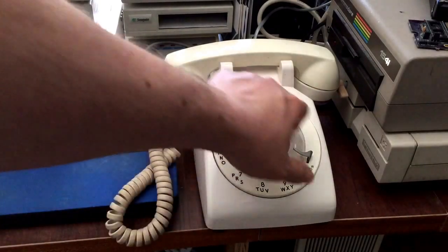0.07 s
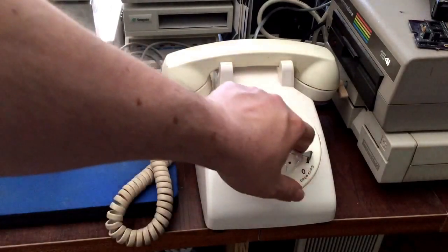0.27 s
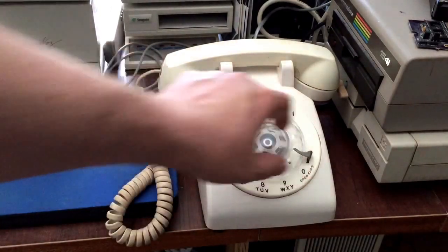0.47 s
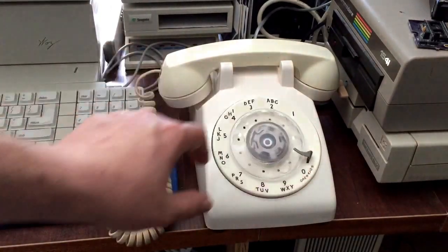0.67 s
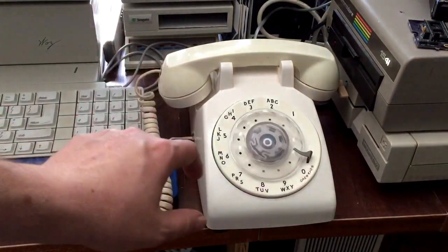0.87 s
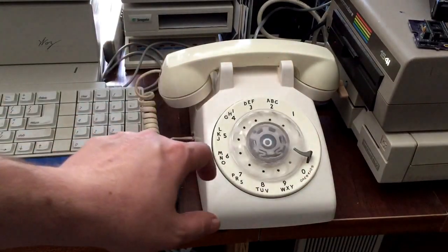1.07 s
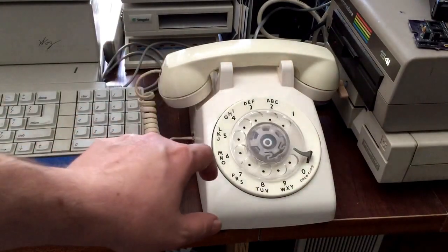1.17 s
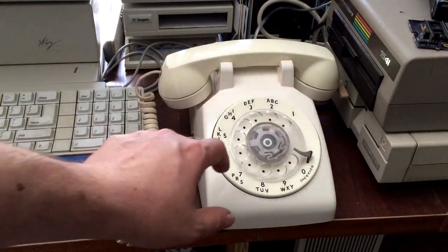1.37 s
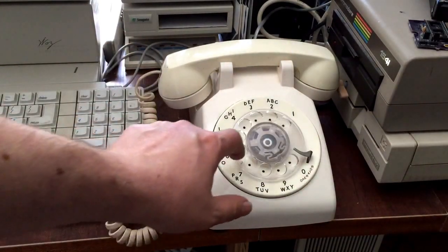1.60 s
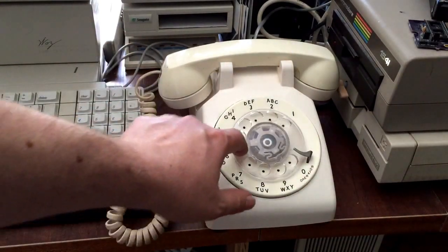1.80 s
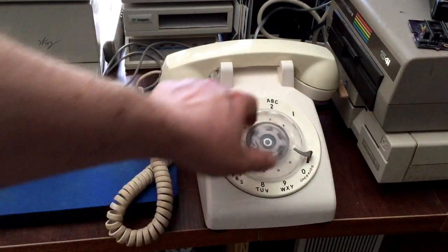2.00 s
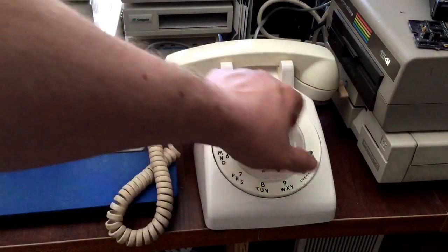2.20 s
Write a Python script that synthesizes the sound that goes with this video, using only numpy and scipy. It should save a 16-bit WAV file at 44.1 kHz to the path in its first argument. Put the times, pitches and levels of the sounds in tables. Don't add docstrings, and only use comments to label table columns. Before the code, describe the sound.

Close microphone in a small room with faint fan hum: gritty dial winding and a sharp stop click, a ticking geared return ending in a loud hard clack, then quiet, faint touches and renewed winding.

```python
import sys
import numpy as np
from scipy import signal
from scipy.fft import rfft, irfft
from scipy.io import wavfile
from scipy.ndimage import uniform_filter1d, map_coordinates

SR = 44100
rng = np.random.default_rng(int(sys.argv[2]) if len(sys.argv) > 2 else 0)


def to_linear_factor(level_db):
    exponent = np.asarray(level_db, float) / 20
    return 10 ** exponent


def master(y):
    cut = np.clip(np.atleast_2d(y).T, -1, 1)
    pcm = np.round(cut * 32767)
    wavfile.write(sys.argv[1], SR, pcm.astype(np.int16))


N = 99225
T = np.arange(N) / SR
HZ = np.fft.rfftfreq(1 << 17, 1 / SR)

# (frequency [Hz], width [Hz], level [dB])
PLATE_MODES = [(2395, 340, -10.5), (3020, 295, -0.5), (3287, 320, -5), (3820, 820, -9.5), (4360, 150, -9)]
# (frequency [Hz], width [Hz], level [dB])
SHELL_MODES = [(560.5, 99, 9.5), (724, 120, -28), (1116, 135, 3.5), (1520, 190, 1.5), (1755, 68, 1.5)]


def unit(x):
    return x / np.sqrt(np.mean(x ** 2) + 1e-20)


def along(points, hz):
    f, v = np.transpose(points)
    return np.interp(np.log(hz + 1), np.log(f + 1), v)


def level(rows, column=1):
    r = np.array(rows)
    return to_linear_factor(np.interp(T, r[:, 0], r[:, column], -150, -150))


def wobble(rate):
    knots = rng.standard_normal(int(N * rate / SR) + 4)
    return map_coordinates(knots, [T * rate])


def body(x, peaks, bed=((1, -60),), bed_db=0):
    low_cut = np.minimum(HZ / bed[0][0], 1) ** 4
    power = to_linear_factor(2 * (along(bed, HZ) + bed_db)) * low_cut
    for hz, width, db in peaks:
        power = power + to_linear_factor(2 * db) / (1 + (2 * (HZ - hz) / width) ** 2) ** 1.86
    cepstrum = irfft(np.log(power / power.mean() + 1e-12) / 2)
    half = len(HZ) - 1
    cepstrum[1:half] *= 2
    cepstrum[half + 1:] = 0
    return irfft(rfft(x, 2 * half) * np.exp(rfft(cepstrum)))[:N]


def bursts(times, dbs, lengths, rise=0.22):
    t = np.arange(SR // 8) / SR
    out = np.zeros(N + len(t))
    for s, db, length in zip(times, dbs, np.maximum(lengths, 1e-3)):
        attack = (1 - np.exp(-t / (rise * length))) ** 2
        shape = attack * to_linear_factor(db - 20 * t / length)
        out[round(s * SR):][:len(t)] += shape * np.sign(rng.standard_normal(len(t)))
    return out[:N]


def grit(rate, spread_db, smooth):
    struck = rng.random(N) < rate / SR
    hits = struck * to_linear_factor(spread_db * rng.exponential(size=N)) * rng.standard_normal(N)
    return unit(unit(hits) + smooth * rng.standard_normal(N))


def ringing(rings):
    out = np.zeros(N)
    for s, hz, db, t60 in rings:
        t = np.maximum(T - s, 0)
        envelope = (1 - np.exp(-t / 0.0015)) * to_linear_factor(db - 60 * t / t60)
        out += envelope * np.sin(2 * np.pi * hz * t)
    return out


def winding():
    # (time [s], level [dB])
    first_pull = [
        (0, -51),
        (.07, -52),
        (.1, -46.5),
        (.13, -52.5),
        (.22, -47.5),
        (.26, -54),
        (.31, -69),
        (.4, -61.5),
    ]
    # (time [s], level [dB])
    second_pull = [
        (1.8, -71),
        (1.9, -68),
        (1.94, -52),
        (2.02, -51.5),
        (2.05, -57.5),
        (2.12, -53),
        (2.25, -54.5),
    ]
    # (frequency [Hz], width [Hz], level [dB])
    wind_modes = [(556, 83, -6), (732, 96, -7), (1053, 118, 1), (1468, 360, -9.5), (3020, 104, -9),
                  (3955, 300, -13), (4330, 164, -15), (6150, 1150, -22.5)]
    # (frequency [Hz], level [dB])
    wind_bed = [(180, -26.5), (300, -12.5), (404, -18.5), (1050, -6), (1970, -50), (3070, -11.5),
                (4960, -29.5), (9600, -29.5), (15500, -48)]
    unsteady = to_linear_factor(0.5 + 1.8 * wobble(34.81) + 1.0 * wobble(200))
    effort = (level(first_pull) + level(second_pull)) * unsteady
    rubbing = effort * grit(rate=3000, spread_db=-4.6, smooth=1.0)
    return body(rubbing, wind_modes, wind_bed, bed_db=-1)


def fans():
    # (frequency [Hz], level [dB])
    air_bed = [(15, -62), (25, -35.5), (113, -14.5), (281, -27), (313, -4.5), (368, -28.5), (666, -25),
               (741, -27), (15500, -50.5)]
    # (frequency [Hz], width [Hz], level [dB])
    fan_hums = [(71.2, 3.8, -72.5), (121.4, 11, -72.5), (262, 79, -68.5), (325, 13.6, -62.5)]
    air = body(rng.standard_normal(N), [], air_bed)
    hums = 0
    for hz, width, db in fan_hums:
        hum = body(rng.standard_normal(N), [(hz, width, 0)], [(1, -62)])
        hums = hums + to_linear_factor(db) * unit(hum)
    return to_linear_factor(-61) * air + hums


def contact_snaps():
    # (time [s], peak level [dB])
    snap_events = [(0.2272, -19.5), (0.446, -35.5), (0.475, -41.5), (0.484, -45), (0.492, -43),
                   (0.5274, -49), (0.542, -47.5), (0.581, -47), (0.5939, -45), (0.6001, -40), (0.6457, -44),
                   (0.687, -48), (0.7006, -41), (0.7072, -37), (.7135, -44), (0.7548, -39.5), (0.811, -38),
                   (0.8629, -41.5), (0.918, -42), (0.924, -45), (.952, -54), (0.965, -39), (1.022, -37),
                   (1.029, -49), (1.063, -50), (1.077, -35), (1.085, -42), (1.125, -44), (1.14, -54),
                   (1.1792, -37), (1.901, -65), (1.9938, -42.5), (2.019, -43), (2.032, -57)]
    # (frequency [Hz], width [Hz], level [dB])
    spring_modes = [(6400, 1400, -7), (8520, 530, -3), (9360, 600, -0.5), (10720, 2200, -4.5),
                    (13800, 2500, -9.5)]
    s, db = np.transpose(snap_events)
    out = 0
    for hz, width, mode_db in spring_modes:
        uneven_db = 1.7 * rng.standard_normal(len(s))
        snap = bursts(s, db + mode_db - 4.5 + uneven_db, np.full(len(s), 0.0062), rise=0.12)
        out = out + body(snap, [(hz, width, 0)], [(3000, -24.5), (15000, -30)])
    return out


def knocking():
    # (time [s], plate level [dB], shell level [dB], metal level [dB], length [s])
    knock_events = [(0.2279, -26, -37.5, -36, 0.011), (0.274, -33.5, -47, -33.5, 0.013),
                    (0.3392, -50, -59, -46, 0.009), (0.398, -36.5, -46.5, -43.5, 0.017),
                    (0.441, -38, -48, -61, 0.016), (0.597, -42, -44, -49.5, 0.015),
                    (0.698, -42, -49, -51, 0.013), (0.7736, -50, -42, -60, 0.0035),
                    (0.4575, -27, -49, -41, 0.0073), (1.0833, -27, -49, -39, 0.0062),
                    (1.7456, -49.5, -58.5, -56, 0.02), (1.84, -55.5, -61.5, -57, 0.017),
                    (1.896, -64, -60, -48.5, 0.011), (1.951, -34.5, -54, -36.5, 0.011),
                    (1.9702, -27.5, -39.5, -43.5, 0.0057), (2.018, -42, -44.5, -60, 0.0064),
                    (2.0655, -40.5, -49, -56, 0.011), (2.0948, -31.5, -34.5, -53, 0.0071),
                    (2.163, -49, -56, -55, 0.029), (2.227, -54, -50, -76, 0.0041)]
    # (frequency [Hz], width [Hz], level [dB])
    metal_modes = [(5280, 760, -6), (8520, 1100, -4.5), (9800, 230, -4)]
    s, plate_db, shell_db, metal_db, length = np.transpose(knock_events)
    plate = bursts(s, plate_db + 4, 0.6 * length)
    shell = bursts(s, shell_db + 9, 1.22 * length)
    metal = bursts(s, metal_db + 6, 0.6 * length)
    return (body(plate, PLATE_MODES, [(1800, -49), (2500, -40.5), (5000, -33.0), (8000, -43)])
            + body(shell, SHELL_MODES, [(200, -47), (500, -22.5), (2200, -12.5), (3000, -34)])
            + body(metal, metal_modes, [(4000, -49), (5500, -0.5), (11000, -21), (15500, -21.5)]))


def light_touches():
    # (time [s], frequency [Hz], level [dB], t60 [s])
    touched_modes = [
        (.274, 3047, -29, 0.032),
        (.3405, 3020, -42.5, 0.034),
        (1.7495, 3230, -46.5, 0.053),
        (1.7525, 520, -43.5, 0.081),
        (1.843, 1014, -51.5, 0.082),
        (.353, 800, -48, 0.033),
    ]
    return ringing(touched_modes)


def spinning():
    # (time [s], level [dB])
    gear_rattle = [
        (.399, -57),
        (.41, -55.5),
        (.43, -55.5),
        (.47, -49.5),
        (.56, -55.5),
        (.72, -52.5),
        (1.1, -54.5),
        (1.235, -51.5),
    ]
    tooth_mesh = sum([ [(0.45, 604, -73), (0.462, 608.1, -51), (0.494, 612, -48.5), (0.528, 611, -65),
                  (0.536, 609.7, -45.5), (0.632, 605.4, -52.5), (0.646, 602.5, -46.5), (0.792, 610.6, -51),
                  (0.8, 605, -44)], [(0.81, 610.3, -44.5), (0.892, 613.3, -51), (0.98, 609, -46),
                  (0.998, 606, -59), (1.018, 609.0, -47.5), (1.09, 615.2, -57), (1.12, 614.7, -46.5),
                  (1.162, 612, -53), (1.235, 609, -49)], ], [])
    # (frequency [Hz], width [Hz], level [dB])
    spin_modes = [(520, 83, -7), (755, 34, -2.5), (1054, 310, -3.5), (1465, 234, -7), (1645, 36, -4.5),
                  (2900, 400, -18), (4330, 230, -20.5)]
    # (frequency [Hz], level [dB])
    spin_bed = [(88, -48), (150, -10), (404, -13), (607, -1), (827, -17.5), (2980, -15.5), (4900, -26),
                (9540, -34.5), (15500, -48)]
    rattle = level(gear_rattle) * to_linear_factor(4.0 + 3.32 * wobble(89.83))
    rattle = rattle * grit(rate=3000, spread_db=1.26, smooth=0.71)
    s, hz, _ = np.transpose(tooth_mesh)
    mesh_hz = np.interp(T, s, hz) * (1 + 0.0059 * wobble(130))
    swell = uniform_filter1d(level(tooth_mesh, column=2), size=200)
    roughness = to_linear_factor(2.0 + 2.2 * wobble(60))
    tone = swell * roughness * np.sin(2 * np.pi * np.cumsum(mesh_hz) / SR)
    return body(rattle, spin_modes, spin_bed, bed_db=-3.5) + tone


def governor_ticks():
    # (time [s], peak level [dB], note [Hz])
    tick_events = [(0.4846, -36, 2920), (0.5099, -63, 3220), (0.5373, -44, 2800), (0.5626, -42, 2980),
                   (0.5851, -36.5, 3000), (0.6178, -52, 2900), (0.6429, -69, 2900), (0.6695, -52, 3100),
                   (0.691, -37, 2980), (0.7159, -42, 3120), (0.74, -42.5, 2850), (0.7733, -46, 2820),
                   (0.7938, -41, 2993), (0.8298, -41, 2900), (0.8522, -59, 3030), (0.8769, -33.5, 3050),
                   (0.8989, -39, 3020), (0.9256, -35, 3230), (0.9514, -43, 2848), (0.9644, -56, 2850),
                   (1.0034, -37.5, 3000), (1.0316, -38, 3063), (1.0439, -45, 2980), (1.0558, -43, 2944),
                   (1.0693, -39, 2900), (1.1065, -44, 2890), (1.1405, -47, 2900), (1.1607, -40, 2980),
                   (1.191, -45, 3000), (1.2125, -38, 2745)]
    s, db, note_hz = np.transpose(tick_events)
    modes = PLATE_MODES + [(hz, width, shell_db - 6.0) for hz, width, shell_db in SHELL_MODES[2:]]
    out = 0
    for hz, width, mode_db in modes:
        uneven_db = 3 * rng.standard_normal(len(s))
        push = bursts(s, db + mode_db + 5 + uneven_db, np.full(len(s), 0.0017))
        out = out + body(push, [(hz, 1.08 * width, 0)], [(hz, -33), (9000, -40), (14000, -60)])
    note_t60_s = 0.022
    return out + ringing([(at, hz, peak - 2.5, note_t60_s) for at, peak, hz in zip(s, db, note_hz)])


def homing():
    # (time [s], peak level [dB], length [s])
    slam = [
        (1.2318, -18.5, 0.0042),
        (1.2335, -14, 0.005),
        (1.2362, -12.5, 0.006),
        (1.239, -27.5, 0.024),
        (1.24, -44, 0.075),
    ]
    # (frequency [Hz], width [Hz], level [dB])
    slam_modes = [(566, 92, 3.8), (1080, 140, 4.4), (2900, 700, 0.98), (4060, 410, 7.4)]
    # (frequency [Hz], level [dB])
    slam_bed = [(71, -53), (120, -11), (1120, -1), (1910, -11.5), (4050, 0), (4760, -9), (5490, -1.5),
                (15500, -13)]
    # (frequency [Hz], width [Hz], level [dB])
    desk_modes = [(268.5, 18, 3), (305, 93, -3)]
    s, db, length = np.transpose(slam)
    desk_push = bursts([1.24], [-34], [.06])
    thump = body(desk_push, desk_modes, [(150, -18.0), (200, -8), (400, -35), (1000, -67)])
    return body(bursts(s, db, length), slam_modes, slam_bed, bed_db=1.0) + thump


def walls(x):
    # (frequency [Hz], t60 [s])
    room_t60 = [(200, 0.24), (2000, 0.18), (12000, 0.13)]
    out = np.zeros(N + SR)
    chunk, delay = 2048, 200
    for start in range(0, N, chunk):
        hz, t, z = signal.stft(rng.standard_normal(SR // 4), SR, nperseg=256)
        decay = to_linear_factor(-60 * t / along(room_t60, hz)[:, None])
        tail = signal.istft(z * decay, SR, nperseg=256)[1]
        wet = signal.fftconvolve(x[start:start + chunk], tail / np.linalg.norm(tail))
        out[start + delay:][:len(wet)] += wet
    return out[:N]


def scene():
    dial = winding() + spinning() + homing()
    phone = dial + contact_snaps() + governor_ticks() + knocking() + light_touches()
    wet_db = -11.5
    return (phone + to_linear_factor(wet_db) * walls(phone) + fans())[None]


def band_limit(x):
    return signal.sosfilt(signal.butter(12, 16210, fs=SR, output="sos"), x)


def record(dry):
    top_hz = 15150
    limit = signal.butter(24, top_hz, fs=SR, output="sos")
    return band_limit(signal.sosfilt(limit, dry))


dry = scene()
out = record(dry)
master(out)
```